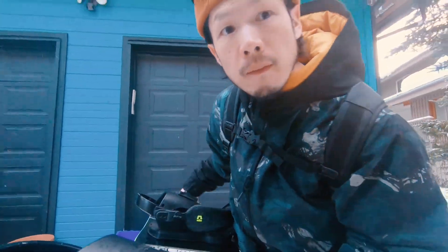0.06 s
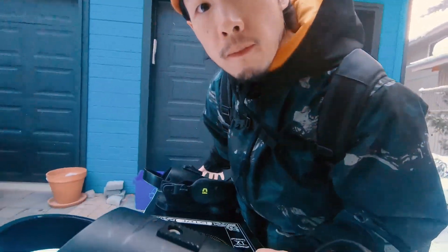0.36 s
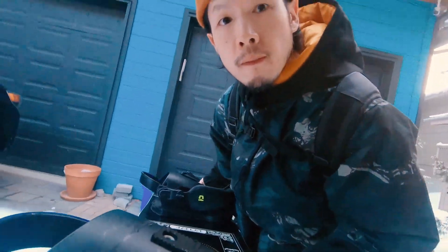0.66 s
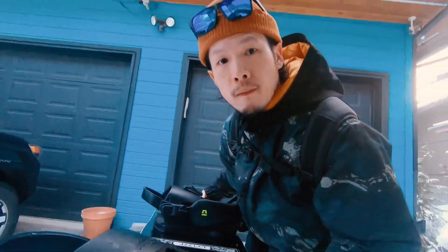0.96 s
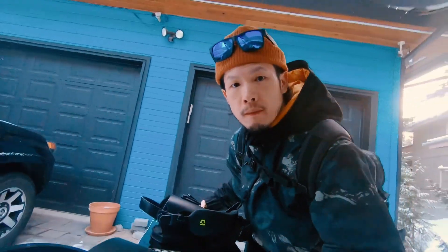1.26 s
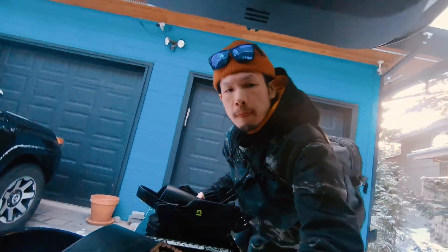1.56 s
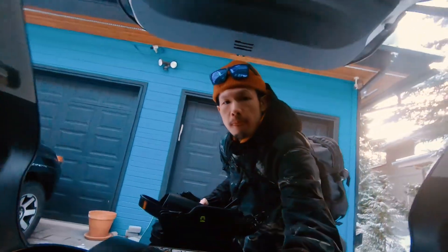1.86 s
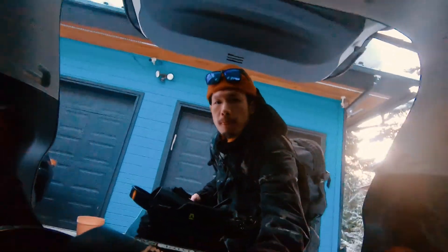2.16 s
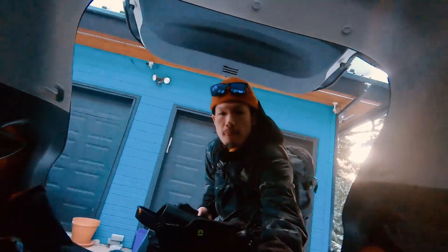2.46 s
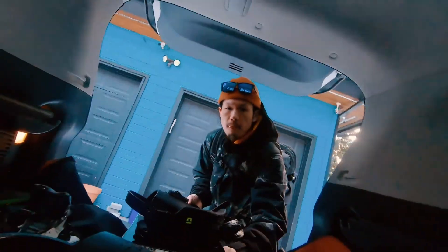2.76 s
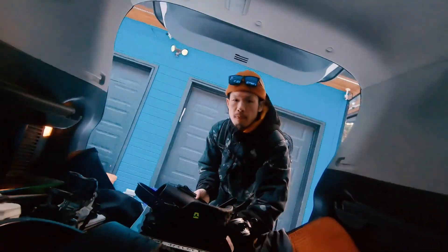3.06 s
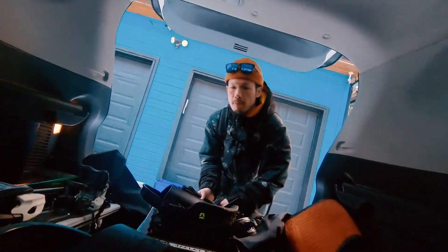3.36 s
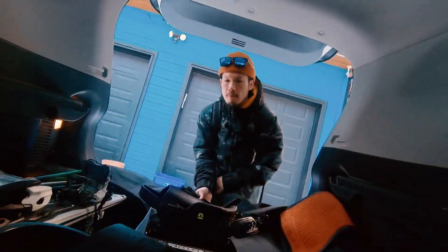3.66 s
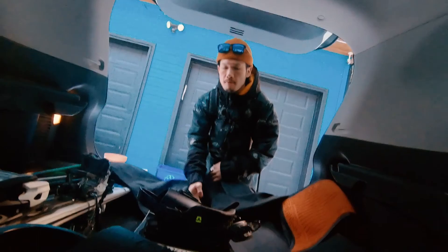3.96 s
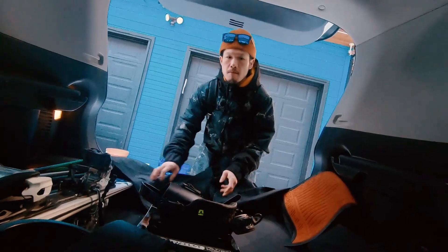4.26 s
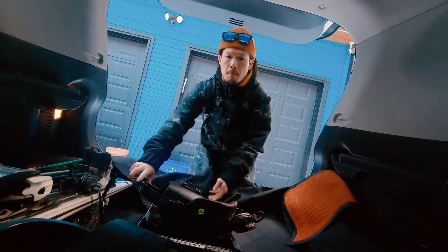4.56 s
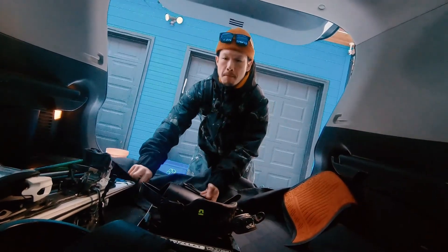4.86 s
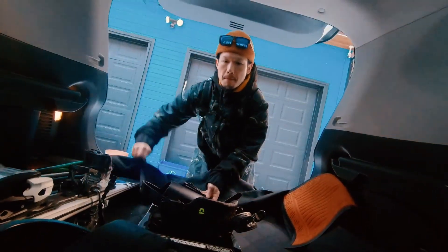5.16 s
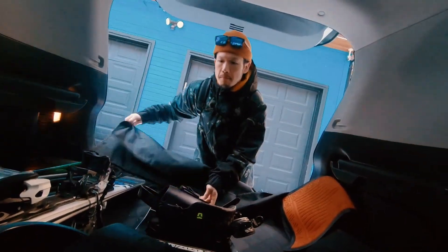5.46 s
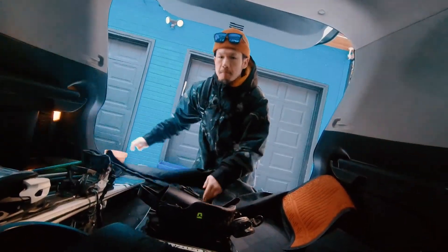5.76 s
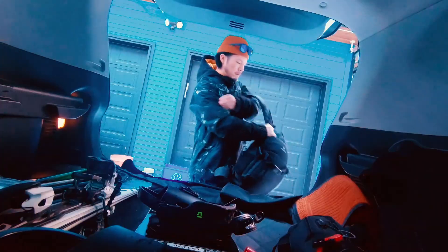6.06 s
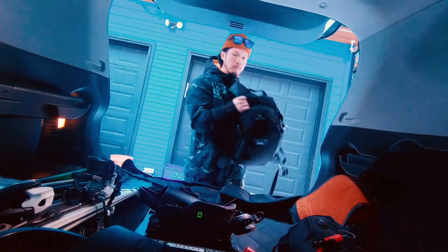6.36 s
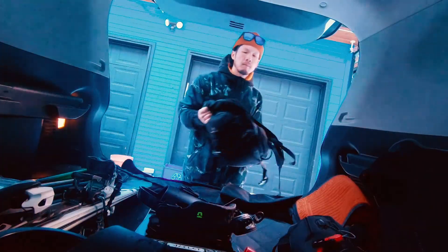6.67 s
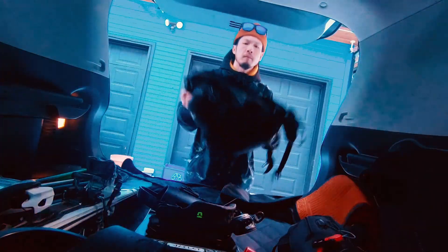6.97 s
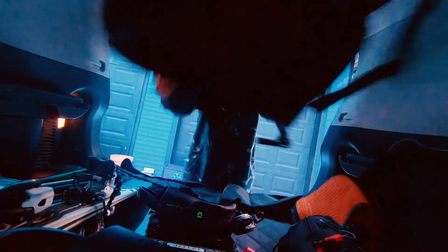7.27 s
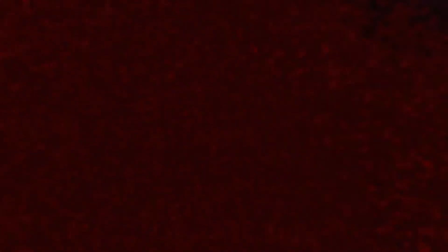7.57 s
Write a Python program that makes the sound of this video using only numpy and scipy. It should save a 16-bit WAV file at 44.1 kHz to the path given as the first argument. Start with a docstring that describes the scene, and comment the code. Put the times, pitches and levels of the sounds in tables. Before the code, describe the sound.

Heard close up from a microphone riding on the load, nylon bags drag and judder across a car's cargo carpet. Gear thumps on the hollow floor, buckles click and a hard edge scrapes. A board lands with a padded knock, and quieter swishes and bumps follow over faint outdoor air. At the end a backpack hits the microphone with loud thuds, plastic snaps and a low shudder.

```python
"""Bags of snowboard gear are pushed into the back of a car, with the microphone riding on the load.
From the start, sliding friction makes nylon swish and drag over the carpet, and a bag judders by
stick and slip. Near 2 s gear thumps on the hollow load floor and buckles tick; then a hard edge
scrapes. At 3.8 s a board lands on the padded load, and softer pushes follow. Near 7.4 s a backpack
is thrown in and lands on the microphone, shaking it on its mount."""
import sys
import numpy as np
from scipy import signal
from scipy.io import wavfile
from scipy.ndimage import map_coordinates

SR = 44100
rng = np.random.default_rng(int(sys.argv[2]) if len(sys.argv) > 2 else 0)


def master(y):
    """Save y as 16-bit WAV."""
    cut = np.clip(np.atleast_2d(y).T, -1, 1)
    pcm = np.round(cut * 32767)  # scale
    wavfile.write(sys.argv[1], SR, pcm.astype(np.int16))


N = 340345
TIME = np.arange(N) / SR


# Long pushes of the load. Each row: start, peak and end in seconds, sag at both ends in dB,
# then relative levels of rumble, carpet drag, rub and nylon swish in dB.
PUSHES = [(-0.1, 1.0, 1.45, 0, -46, -42, -49.5, -68.5), (1.41, 2.206, 2.45, 7.5, -42.5, -43.5, -51.5, -78),
          (2.366, 3.347, 3.83, 7.5, -52, -42.5, -47, -50), (3.886, 4.05, 4.44, 5.5, -79, -64, -64, -62.5),
          (4.423, 5.25, 5.57, 4, -49, -51.5, -62, -63), (5.54, 5.9, 6.71, 3, -66, -51.5, -60, -62.5),
          (6.75, 6.904, 7.8, 3.5, -62, -49.5, -62.5, -66)]
def push_gains(edge_s=0.097):
    """Friction noise follows effort: rumble, drag, rub and swish build to a peak and ease off."""
    gains = np.zeros((4, N), np.float32)
    for start, peak, end, sag_db, *levels in PUSHES:
        moving = np.clip(np.minimum(TIME - start, end - TIME) / edge_s, 0, 1)
        effort = amp(np.interp(TIME, [start, peak, end], [-sag_db, 0, -sag_db]))
        gains += amp(levels)[:, None] * moving * effort
    return gains


# Spectra of the four friction layers. Each row: frequency in Hz, gain in dB.
RUMBLE_SPECTRUM = [(12, -22.5), (28, -9), (55, 1.5), (100, -7.5), (140, -8), (220, -22), (500, -82.5)]
DRAG_SPECTRUM = [(50, -38.5), (110, -20), (160, 2), (290, -4), (400, -5), (580, -9.5), (800, -26),
                 (1600, -68), (4000, -76.5)]
RUB_SPECTRUM = [(200, -22.5), (480, -16.5), (720, 4.5), (950, 1.5), (1100, -1.5), (1450, -0.5),
                (1900, -5.5), (2500, -15), (4000, -20.5), (9000, -42.5)]
SWISH_SPECTRUM = [(700, -25), (1700, 3.5), (2400, 3), (5000, -4.5), (9000, -8), (12000, -24), (16000, -20)]
# Rocking of the load. Each row: middle and half length in seconds, relative level in dB.
LURCHES = [(0.54, 0.11, -36.5), (2.29, 0.059, -31), (2.75, 0.042, -41), (3.6, 0.066, -47),
           (4.0, 0.096, -39.5), (4.46, 0.04, -45), (5.22, 0.15, -46.5), (5.62, 0.07, -42),
           (6.88, 0.056, -51), (7.24, 0.17, -48.5)]
# Sweeps of a sleeve or bag over nylon. Each row: middle and half length in seconds,
# then relative levels of swish, drag and treble fizz in dB.
SWEEPS = [(0.978, 0.035, -60, -37, -70), (1.151, 0.084, -71, -40.5, -57), (1.604, 0.017, -56.5, -36, -73),
          (1.783, 0.023, -59.5, -39.5, -57), (2.103, 0.049, -38.5, -42, -39),
          (3.242, 0.036, -50, -39.5, -75), (3.567, 0.04, -47.5, -37, -49), (3.722, 0.13, -54, -43, -57),
          (4.069, 0.031, -54, -38.5, -57), (4.33, 0.074, -66.5, -65, -78.5),
          (4.439, 0.028, -60, -52.5, -62), (4.673, 0.072, -69, -45, -75), (4.752, 0.037, -57.5, -44, -54),
          (4.862, 0.033, -58.5, -55, -55), (5.025, 0.028, -54, -61, -64), (5.198, 0.071, -48, -44.5, -51),
          (5.406, 0.013, -54, -46, -68), (5.495, 0.048, -60, -47.5, -66), (5.783, 0.019, -55, -46.5, -58),
          (6.152, 0.021, -58, -56, -70), (6.819, 0.023, -51, -38, -55), (6.947, 0.13, -56, -45, -66),
          (7.086, .033, -53, -56, -46.5), (7.223, 0.045, -78, -50.5, -82), (7.424, .017, -45, -30, -23)]
def sliding():
    """Sliding friction: fibres catch and release under one uneven grip, above the load's rumble."""
    rumble, drag, rub, swish = push_gains()
    sweep = swells((s, half, db) for s, half, db, _, _ in SWEEPS)
    rumble = np.hypot(rumble, swells(LURCHES))
    drag = np.hypot(drag, swells((s, half, db) for s, half, _, db, _ in SWEEPS))
    rub = np.hypot(rub, amp(2) * sweep)
    swish = np.hypot(swish, sweep)
    grip = unit(amp(wander(per_s=85)))
    fibres = grip * grains(per_s=2200, spread_db=1.5, hiss=1)
    out = amp(-5) * rumble * noise(RUMBLE_SPECTRUM)
    out += amp(-3) * drag * unit(colour(fibres, DRAG_SPECTRUM))
    out += amp(1.9) * rub * unit(colour(np.roll(fibres, SR // 300), RUB_SPECTRUM))
    nylon = grip * grains(per_s=5000, spread_db=0.5, hiss=1)
    return out + amp(4.5) * swish * unit(colour(nylon, SWISH_SPECTRUM))


# Soft blows of the load. Each row: start in seconds, level in dB, frequency in Hz,
# 60 dB decay time (t60) in seconds, level of the floor's boom in dB.
THUDS = [(0.098, -20, 146, 0.16, -21), (0.099, -16.5, 82, 0.14, -53), (0.1, -22.5, 225, 0.09, -52.5),
         (0.1, -23.5, 513, 0.048, -57), (0.324, -33, 253, 0.15, -77), (1.604, -34, 194, 0.13, -62),
         (1.924, -34.5, 200, 0.15, -34), (1.979, -16.5, 368, 0.13, -32), (1.989, -14.5, 158, 0.12, -48),
         (2.04, -16, 130, 0.21, -40), (2.072, -16, 192, 0.086, -40), (2.109, -12, 167, 0.11, -18),
         (2.139, -12, 95, 0.095, -40), (2.178, -23, 128, 0.22, -22), (2.206, -22.5, 300, 0.04, -47),
         (2.249, -14.5, 173, 0.042, -23), (2.346, -36, 400, 0.19, -36), (2.35, -21, 158, .1, -48),
         (3.015, -32.5, 270, 0.091, -60), (3.853, -15, 160, 0.082, -47), (4.052, -34.5, 226.4, .14, -54),
         (4.208, -38, 265, 0.076, -59), (4.53, -36, 164, 0.1, -60), (4.593, -35.5, 282, 0.077, -57),
         (4.785, -32, 87, 0.15, -44), (5.325, -36.5, 112, 0.092, -53), (5.392, -37.5, 35.3, 1, -57),
         (5.573, -32.5, 39.5, .3, -47), (5.68, -39, 163.8, 0.45, -50), (5.933, -35, 268, 0.096, -65),
         (6.281, -42.5, 283.6, 0.45, -66), (6.476, -29, 156, 0.05, -35), (6.763, -29, 264, 0.034, -63),
         (6.808, -16.5, 277, 0.096, -54), (7.133, -41, 132, 0.16, -60), (7.392, -13.5, 412, 0.12, -10),
         (7.401, -10.5, 184.4, 0.17, -34), (7.43, -10.5, 101.4, .16, -40), (7.545, -6.5, 179, .042, -25),
         (7.639, -5.5, 128, 0.037, -53)]
def thuds(floor_hz=55.2, floor_t60=0.27):
    """Damped free vibration: each padded blow excites two modes and the boom of the load floor."""
    out = np.zeros(N)
    for start, db, hz, t60, boom_db in THUDS:
        fundamental = ring(hz, db, t60, rise=0.00067)
        overtone = ring(hz * 1.82, db - 10, t60 * 0.12, rise=0.0012)
        boom = ring(floor_hz, boom_db, floor_t60, rise=0.0087)
        add(out, start, fundamental + overtone + boom)
    return out


# Modes of the board. Each row: frequency in Hz, level in dB, swell time and t60 in seconds.
BOARD_MODES = [(179.5, -9, 0.021, 0.027), (288, -5, 0.005, 0.033), (359, -14, 0.0017, 0.1),
               (475, -20.5, 0.019, .08), (557, -18, 0.02, 0.028), (731, -23.5, 0.014, 0.032),
               (816, -33, 0.019, 0.032), (994, -21.5, 0.012, 0.078), (1220, -23.5, 0.0038, 0.054),
               (1323, -22.5, 0.0047, 0.041), (5210, -49, 0.0086, .06)]
def board_landing(start=3.838):
    """Cushioned impact: the padding gives way, so each mode swells before it decays."""
    out, t = np.zeros(N), np.arange(SR // 2) / SR
    for hz, db, swell, t60 in BOARD_MODES:
        attack = np.sin(np.pi / 2 * np.minimum(t / swell, 1))
        decay = amp(db - 60 * np.maximum(t - swell, 0) / t60)
        add(out, start, attack * decay * np.sin(2 * np.pi * hz * t))
    return out


# Partials of a buckle. Each row: multiple of the pitch, gain in dB, share of the base t60.
BUCKLE_PARTIALS = [(1, 0.5, 0.69), (1.42, -6, 0.36), (2.15, -17, 0.44)]
# Spectrum of a plastic crack. Each row: frequency in Hz, gain in dB.
CRACK_SPECTRUM = [(200, -10), (1500, 2.5), (6000, 3), (8000, 5), (10500, -10), (12500, -6), (16000, -16)]
# Buckles and straps striking the microphone's casing. Each row: start in seconds,
# relative ring level in dB, pitch in Hz, base t60 in seconds, relative crack level in dB.
SNAPS = [(0.079, -26, 1000, .013, -50), (0.681, -32.5, 640, 0.048, -55), (1.226, -32, 945, 0.031, -46),
         (1.424, -27, 586, 0.032, -60), (1.573, -32, 620, 0.035, -55), (1.987, -20, 956, 0.046, -41),
         (2.023, -23, 1090, 0.03, -48), (2.058, -14, 1120, .013, -19), (2.083, -14.5, 970, .031, -30),
         (2.113, -14.5, 760, 0.048, -42), (2.131, -18, 5430, 0.011, -15), (2.156, -12.5, 950, 0.034, -15),
         (2.205, -21, 1400, .014, -43), (2.22, -20.5, 4530, 0.011, -35), (2.248, -20, 1060, 0.02, -50),
         (2.345, -20.5, 946, 0.019, -26), (3.01, -30.5, 1404, 0.029, -50), (4.297, -46.5, 1425, 0.046, -58),
         (5.017, -40, 3020, .013, -52), (5.397, -38, 650, 0.044, -51), (6.476, -40, 860, 0.046, -46),
         (6.6415, -28.5, 965.8, 0.023, -48), (6.8, -30, 420, .018, -28.5), (7.384, -12.5, 1350, .018, -30),
         (7.395, -11, 1140, 0.022, -22), (7.406, -2.5, 1560, 0.008, -9), (7.422, -11, 1140, 0.013, -24),
         (7.445, -5, 1450, 0.0094, -20), (7.452, -4, 2840, 0.0059, -13), (7.4878, -7, 2350, 0.0065, -29),
         (7.501, -4.5, 935, 0.0057, -47), (7.505, 4.5, 915, 0.0034, -26), (7.5185, -25, 1530, 0.0072, -48),
         (7.5282, -3, 770, 0.012, -26), (7.544, -15.5, 4230, 0.012, -2), (7.5595, -19.5, 864, 0.079, -11),
         (7.5765, -19, 1800, 0.01, -25), (7.622, -13, 660, .016, -42), (7.636, -12.5, 5640, 0.011, -32),
         (7.681, -15, 885, 0.056, -66)]
def buckle_snaps(crack_s=0.00091):
    """Hard impact: brief contact gives a broadband crack and short inharmonic partials."""
    rings, cracks, t = np.zeros(N), np.zeros(N), np.arange(SR // 20) / SR
    for start, db, hz, t60, crack_db in SNAPS:
        for multiple, partial_db, share in BUCKLE_PARTIALS:
            add(rings, start, ring(hz * multiple, db + partial_db, t60 * share, rise=0.0003))
        add(cracks, start, amp(crack_db) * np.exp(-t / crack_s) * rng.standard_normal(len(t)))
    return amp(2.5) * rings + colour(cracks, CRACK_SPECTRUM)


# Bright spectrum of cloth crushed at the microphone. Each row: frequency in Hz, gain in dB.
CRUSH_SPECTRUM = [(900, -31), (1900, 4), (2800, 2), (4000, 2), (5500, 4), (6500, 5), (9000, -5),
                  (12000, -15.5), (16000, -25.5)]
# Modes of the microphone's casing. Each row: frequency in Hz, gain in dB, t60 in seconds.
CASING_MODES = [(390, -45, 0.076), (733, -45, 0.049), (940, -59.5, 0.017), (1114, -37.5, 0.0048),
                (1302, -41.5, 0.032), (1630, -61.5, 0.036), (2010, -57, 0.013), (2275, -56.5, 0.028),
                (3340, -75, .06), (4200, -41, 0.017), (5960, -38, 0.02)]
# Shoves of cloth. Each row: start and length in seconds, relative rub and swish levels in dB.
SCUFFS = [(0.076, .023, -33.5, -66), (1.221, 0.0076, -38, -59), (1.576, .025, -45.5, -73),
          (1.916, 0.011, -39.5, -57), (1.968, 0.023, -27, -43), (2.012, 0.02, -28.5, -47),
          (2.058, 0.067, -22, -41), (2.123, 0.036, -21.5, -26.5), (2.163, .008, -32.5, -30.5),
          (2.218, 0.0063, -23, -26.5), (2.229, 0.025, -28.5, -57), (2.263, 0.064, -43.5, -54.5),
          (2.338, 0.013, -27, -36.5), (3.017, 0.022, -36.5, -59), (3.816, 0.038, -31.5, -69),
          (3.875, 0.045, -42, -59.5), (4.596, 0.0081, -45.5, -61), (5.039, 0.01, -45, -58),
          (5.65, 0.023, -42.5, -82), (5.873, .015, -44, -67), (5.924, 0.023, -47.5, -71),
          (6.029, 0.013, -52, -54), (6.274, 0.018, -50, -67), (6.475, 0.015, -38.5, -52),
          (6.642, 0.0074, -35.5, -63), (6.728, 0.01, -47, -77), (6.796, 0.012, -40.5, -45),
          (6.886, 0.023, -40.5, -60), (7.285, 0.019, -52.5, -68), (7.369, 0.0085, -20.5, -32.5),
          (7.377, 0.033, -15.5, -26.5), (7.411, .043, -18.5, -25.5), (7.45, 0.058, -22.5, -38),
          (7.525, 0.038, -21.5, -32), (7.577, .045, -53, -46.5), (7.623, 0.023, -27, -32),
          (7.658, 0.034, -33, -34.5)]
def scuffs(rise_s=0.0041, fall_s=0.0047, lead_s=0.02):
    """Transient friction: crushed cloth slips in coarse bursts that excite the casing's modes."""
    power, t = np.zeros((2, N)), np.arange(SR // 5) / SR - lead_s
    for start, length, *levels in SCUFFS:
        shape = np.exp(-np.maximum(t - length, 0) / fall_s) / (1 + np.exp(-t / rise_s))
        for layer, db in zip(power, levels):
            add(layer, start - lead_s, (amp(db) * shape) ** 2)
    rub_gain, swish_gain = np.sqrt(power)
    drag = unit(colour(grains(per_s=900, spread_db=2.5, hiss=0.43), DRAG_SPECTRUM))
    rub = unit(colour(grains(per_s=700, spread_db=4.5, hiss=0.46), RUB_SPECTRUM))
    crush = unit(colour(grains(per_s=3000, spread_db=6, hiss=0.99), CRUSH_SPECTRUM))
    cloth = amp(-4.5) * rub_gain * (amp(1) * drag + rub) + amp(0.5) * swish_gain * crush
    return cloth + resonate(cloth, CASING_MODES)


def microphone_shudder(start=7.372, length_s=0.196, hz=72, wobble=0.197):
    """Nonlinear vibration: the backpack shakes the microphone on its mount as cloth buffets it."""
    count = round(length_s * SR)
    phase = cycles(hz * np.exp(wobble * wander(per_s=90)[:count])) * 2 * np.pi
    sway = np.sin(phase) + amp(-9) * np.cos(2 * phase)  # the mount is stiffer one way
    buffet = unit(noise([(10, -11), (45, 5), (120, -3), (200, -10), (280, -26), (800, -45)])[-count:])
    out = np.zeros(N)
    add(out, start, amp(-13) * signal.windows.tukey(count, 0.2) * (sway + amp(-7) * buffet))
    return out


# Modes of the bag. Each row: frequency in Hz, gain in dB, t60 in seconds.
BAG_MODES = [(322, 0, 0.11), (410, 12.5, 0.018), (545, 1.5, 0.031), (860, -19, .012)]
# Bouts of juddering over the carpet. Each row: middle and half length in seconds, level in dB.
JUDDERS = [(0.423, .03, -43.5), (0.705, 0.063, -38), (1.309, .06, -34), (1.452, .075, -38.5),
           (2.954, 0.044, -45)]
def bag_judder(slips_per_s=67, slowing=0.17, jitter=0.11, slip_share=0.51, creep=0.27):
    """Stick-slip oscillation: each slip is a short rub that rings the bag; each bout slows down."""
    level = swells(JUDDERS)
    progress = sum(bell(s, half, db) ** 2 * np.clip((TIME - s) / half, -2, 2) for s, half, db in JUDDERS)
    progress /= level ** 2  # half lengths from the middle of the prevailing bout
    turns = cycles(slips_per_s * np.exp(jitter * wander(per_s=55) - slowing * progress))
    slips = (creep + np.exp(-(turns % 1) / slip_share)) * rng.standard_normal(N)
    return level * unit(resonate(slips, BAG_MODES))


# Modes of a hard edge. Each row: frequency in Hz, gain in dB, t60 in seconds.
EDGE_MODES = [(966, 2.5, 0.037), (1133, -4.5, 0.059), (1440, 7, 0.032), (1560, -33, .03),
              (1970, -12, 0.042)]
# Scrapes of that edge. Each row: middle and half length in seconds, level in dB.
SCRAPES = [(2.53, 0.077, -42.5), (2.68, 0.034, -36), (2.81, 0.053, -42.5), (3.03, 0.0058, -44)]
def edge_scrape():
    """Forced resonance: dense random slips drive the modes of a hard edge."""
    slips = grains(per_s=630, spread_db=2.5, hiss=0.4)
    return swells(SCRAPES) * unit(resonate(slips, EDGE_MODES))


# Spectrum of nylon on nylon. Each row: frequency in Hz, gain in dB.
FIZZ_SPECTRUM = [(2000, -21), (6000, 6), (9000, -13), (13000, 14), (16000, 3.5)]
def nylon_fizz():
    """Friction noise: each quick sweep of nylon on nylon fizzes high in the treble."""
    return swells((s, half, db) for s, half, _, _, db in SWEEPS) * noise(FIZZ_SPECTRUM)


# Pulls of a ribbed cover. Each row: middle and half length in seconds, level in dB,
# top rate in ribs per second, share of that rate that follows the stroke.
COVER_PULLS = [(0.45, .24, -64, 2530, .04), (5.225, .045, -48, 1050, .5), (5.358, .018, -55, 1850, .3)]
def ribbed_weave(jitter=0.045):
    """Periodic excitation: ribs flick past each other, and the rough tone follows the pull's speed."""
    uneven = np.exp(jitter * wander(per_s=580))
    flutter = unit(amp(4.5 * wander(per_s=200)))
    out = np.zeros(N)
    for middle, half, db, ribs_per_s, glide in COVER_PULLS:
        speed = 1 - glide + glide * bell(middle, half, 0)
        phase = 2 * np.pi * cycles(ribs_per_s * uneven * speed)
        out += bell(middle, half, db) * unit(np.sin(phase) + amp(-6) * np.sin(2 * phase))
    return flutter * out


# Modes of the hollow load floor. Each row: frequency in Hz, gain in dB, t60 in seconds.
FLOOR_MODES = [(165.2, -52, 0.091), (294, -56, 0.13), (394, -56, 0.07), (678, -46.5, 0.055),
               (1050, -66, 0.13), (1432, -53.5, 0.034), (2010, -59.5, 0.029)]
def hollow_floor(slide):
    """Structural resonance: the floor rings under the sliding load."""
    return resonate(slide, FLOOR_MODES)


def cabin_reverb(sound, t60=0.18):
    """Reverberation: upholstery absorbs the reflections, leaving a short, dull tail."""
    t = np.arange(SR // 4) / SR
    echoes = rng.standard_normal(len(t)) * amp(-60 * t / t60) * (t > 0.004)
    tail = signal.oaconvolve(sound, echoes / np.linalg.norm(echoes))[:N]
    return colour(tail, [(30, -8), (200, 7.5), (2000, 3.5), (8000, 0.5)])


def open_air(db=-60.5):
    """Ambient noise: a faint, steady wash from outside the car."""
    return amp(db) * noise([(20, -17.5), (60, -14.5), (160, 3.5), (500, -9.5), (1700, -7.5),
                            (5000, -15), (16000, -26.5)])


def amp(db):
    """Decibels to amplitude gain."""
    return 10 ** (np.asarray(db) / 20)


def unit(x):
    """Normalisation to rms 1."""
    return x / np.sqrt(np.mean(x ** 2) + 1e-20)


def add(mix, start, sound):
    """Superposition: a sound joins the mix at a start in seconds."""
    part = mix[max(round(start * SR), 0):][:len(sound)]
    part += sound[:len(part)]


def colour(x, points, size=8192):
    """Minimum-phase filter through (Hz, dB) points."""
    hz, db = np.transpose(points)
    bins = abs(np.fft.fftfreq(size, 1 / SR))
    log_gain = np.log(amp(np.interp(np.log(bins + 1), np.log(hz + 1), db)))
    taps = np.fft.ifft(np.exp(np.conj(signal.hilbert(log_gain)))).real
    return signal.oaconvolve(x, taps[:size // 2])[:N]


def noise(spectrum):
    """Filtered Gaussian noise of rms 1."""
    return unit(colour(rng.standard_normal(N), spectrum))


def wander(per_s):
    """Random modulation of rms 1, interpolated between per_s values a second."""
    knots = rng.standard_normal(N // 20)
    return unit(map_coordinates(knots, [TIME * per_s], order=1, mode="wrap"))


def cycles(hz):
    """Phase in cycles is the integral of frequency."""
    return np.cumsum(hz) / SR


def ring(hz, db, t60, rise=1e-4):
    """A damped mode with a soft start; it falls 60 dB in t60 seconds."""
    t = np.arange(SR // 2) / SR
    return amp(db - 60 * t / t60) * (1 - np.exp(-t / rise)) * np.sin(2 * np.pi * hz * t)


def resonate(force, modes):
    """Convolution of a force with an impulse response, the sum of an object's modes."""
    return signal.oaconvolve(force, sum(ring(*mode) for mode in modes))[:N]


def grains(per_s, spread_db, hiss):
    """Shot noise: fibres catch and let go in tiny slips of uneven size, within a smooth hiss."""
    size = amp(spread_db * np.minimum(rng.exponential(1, N), 4))
    slips = size * rng.choice([-1, 1], N) * (rng.random(N) < per_s / SR)
    return unit(unit(slips) + hiss * rng.standard_normal(N))


def bell(middle, half_length, db):
    """Gaussian envelope of a stroke that speeds up and slows down smoothly."""
    gain = np.full(N, 1e-9)
    near = slice(*np.searchsorted(TIME, [middle - 5 * half_length, middle + 5 * half_length]))
    gain[near] = amp(db) * np.exp(-0.5 * ((TIME[near] - middle) / half_length) ** 2)
    return gain


def swells(strokes):
    """Joint envelope of several strokes: incoherent sources add in power."""
    return np.sqrt(sum(bell(*stroke) ** 2 for stroke in strokes))


def scene():
    """Superposition: sliding rings the floor, blows reverberate, snaps and shudder stay dry."""
    slide = amp(-1.5) * sliding()
    friction = slide + hollow_floor(slide) + bag_judder() + edge_scrape() + ribbed_weave() + nylon_fizz()
    blows = scuffs() + thuds() + board_landing()
    background = open_air() + amp(-15) * cabin_reverb(blows)
    return (friction + blows + buckle_snaps() + microphone_shudder() + background)[None]


# Response of the microphone in its casing. Each row: frequency in Hz, gain in dB.
MIC_RESPONSE = [(20, 1.5), (2200, -1), (2900, -3), (4500, 2), (5500, -4), (6200, -9.5), (7000, -17),
                (8500, -16), (10000, -20), (11200, -23), (12500, -21.5), (15500, -27.5)]
def record(dry, cutoff_hz=15900):
    """Transduction: the microphone colours the sound, clips on overload and limits the band."""
    heard = np.clip(colour(dry[0], MIC_RESPONSE), -0.95, 0.95)
    lowpass = signal.firwin(511, cutoff_hz, window=("kaiser", 9), fs=SR)
    return signal.oaconvolve(heard, lowpass, "same")[None]


dry = scene()
out = record(dry)
master(out)
```